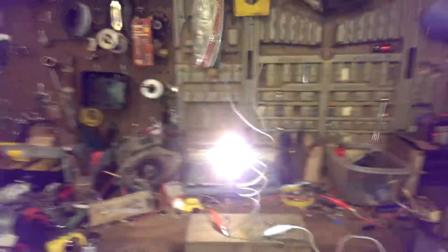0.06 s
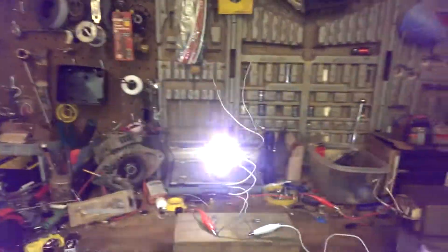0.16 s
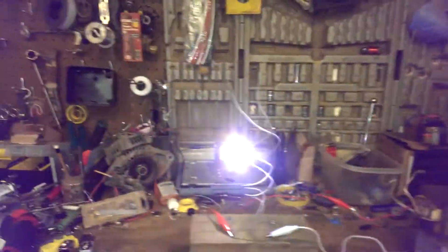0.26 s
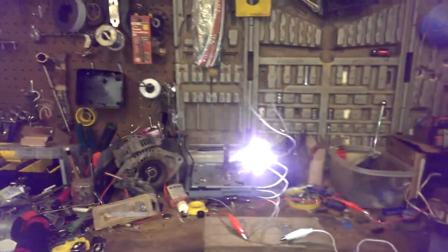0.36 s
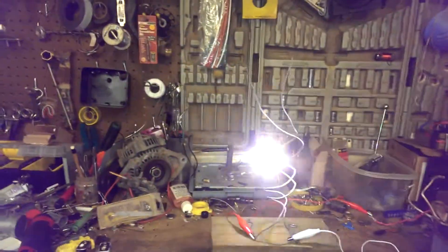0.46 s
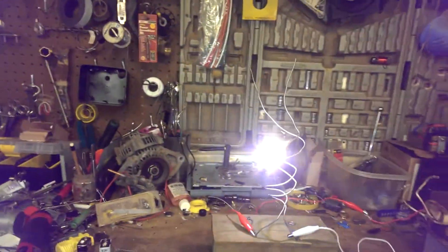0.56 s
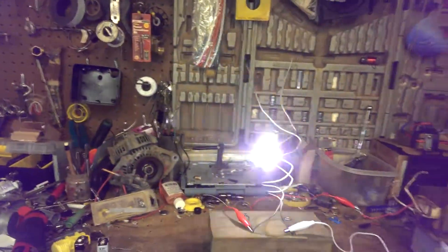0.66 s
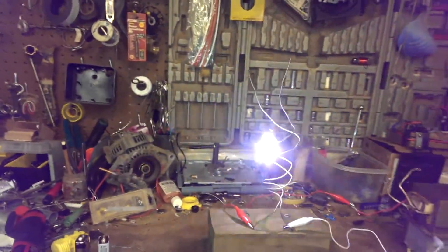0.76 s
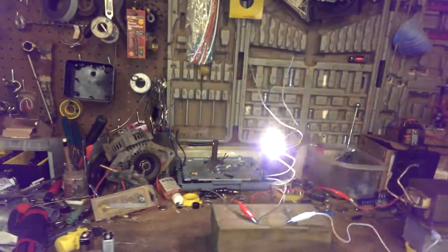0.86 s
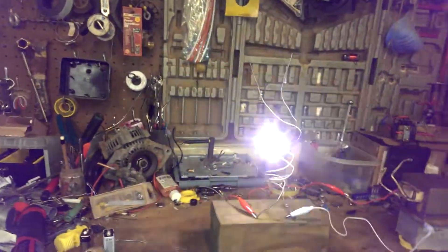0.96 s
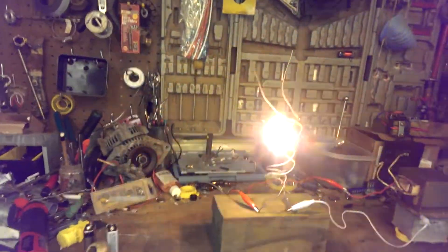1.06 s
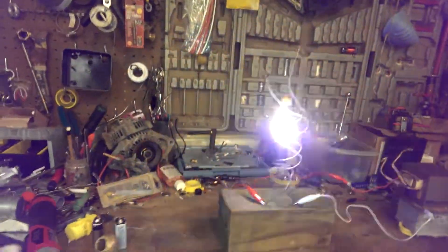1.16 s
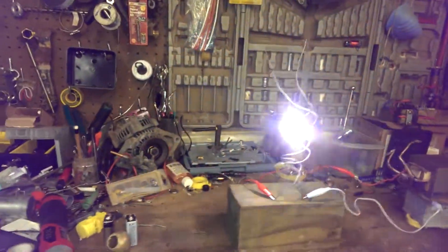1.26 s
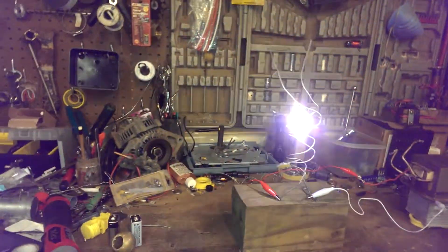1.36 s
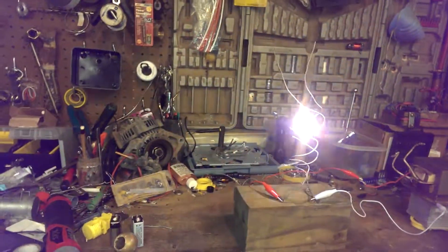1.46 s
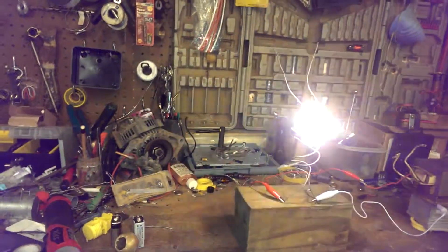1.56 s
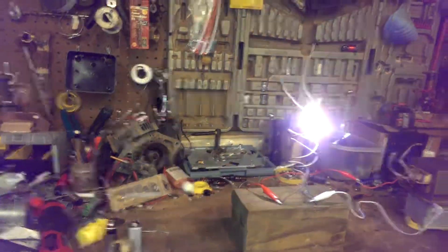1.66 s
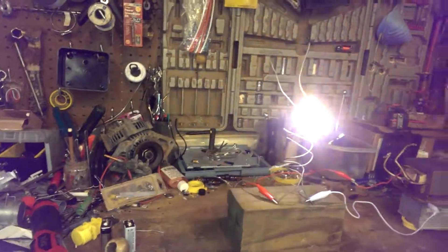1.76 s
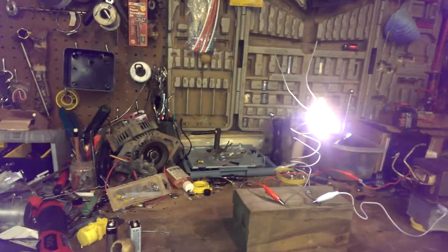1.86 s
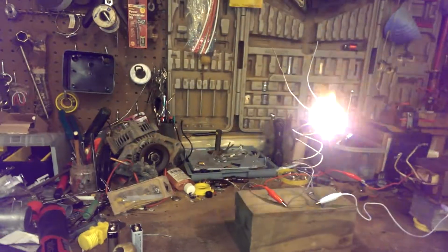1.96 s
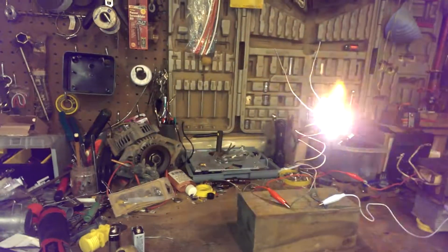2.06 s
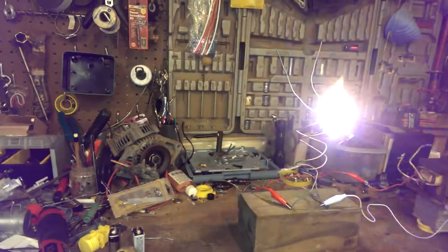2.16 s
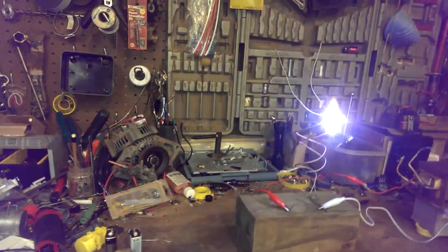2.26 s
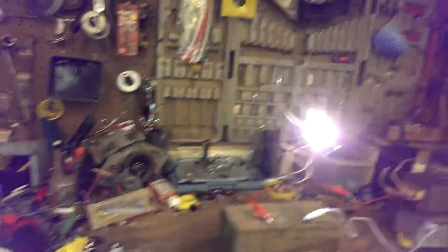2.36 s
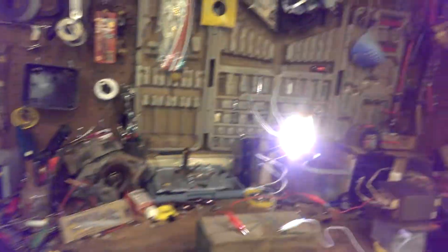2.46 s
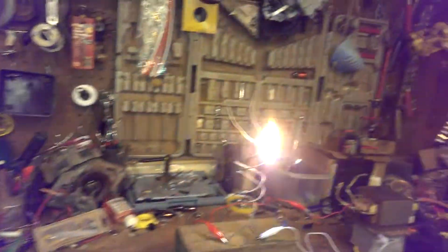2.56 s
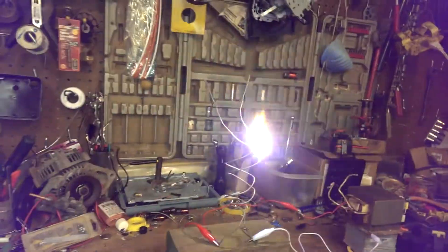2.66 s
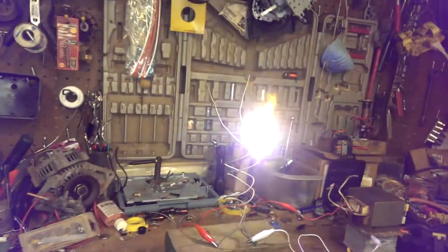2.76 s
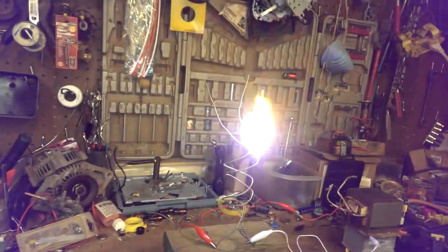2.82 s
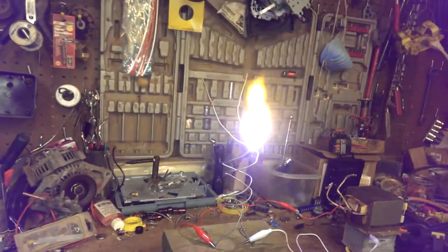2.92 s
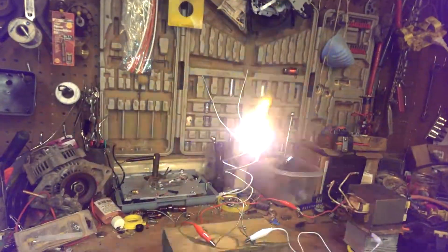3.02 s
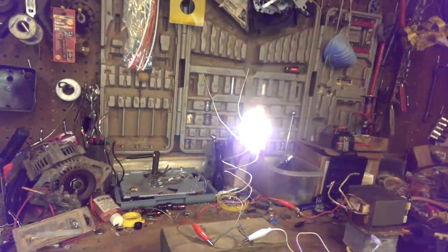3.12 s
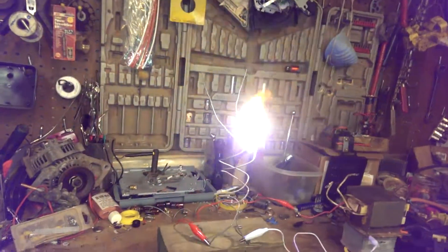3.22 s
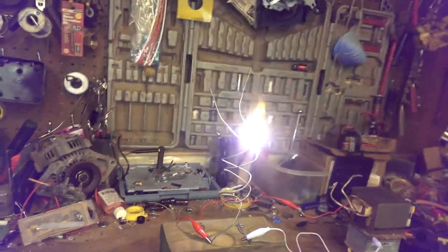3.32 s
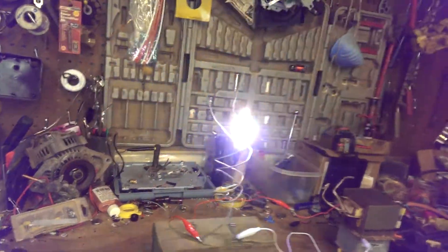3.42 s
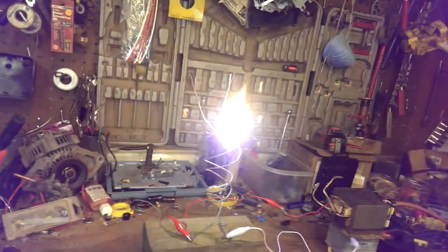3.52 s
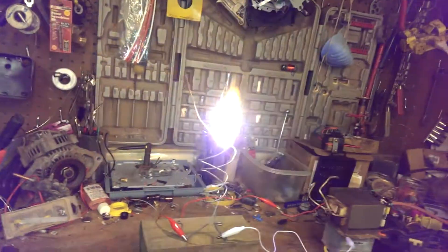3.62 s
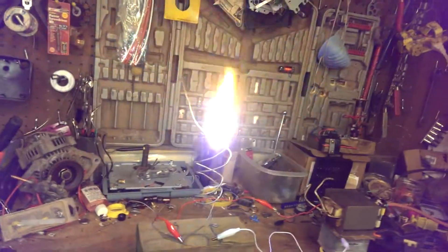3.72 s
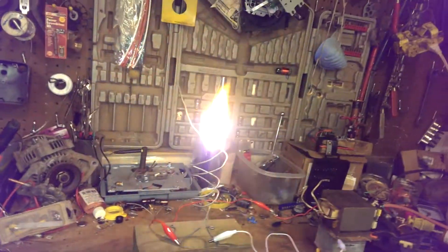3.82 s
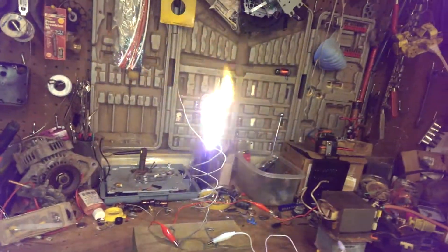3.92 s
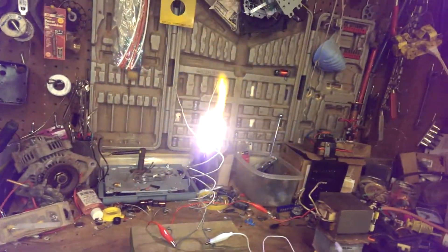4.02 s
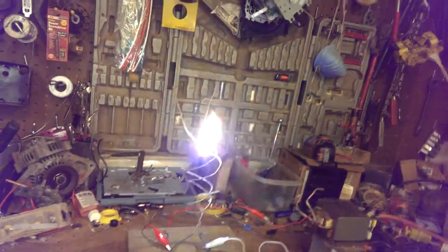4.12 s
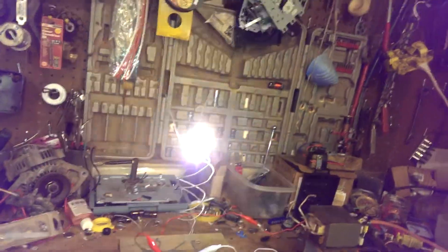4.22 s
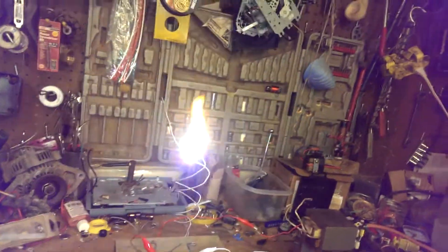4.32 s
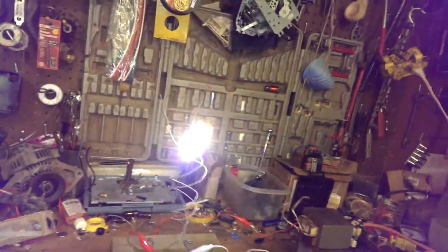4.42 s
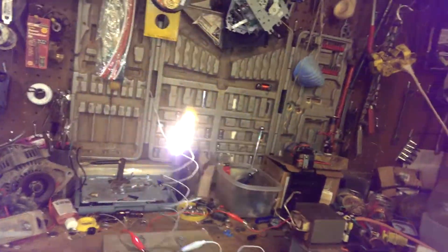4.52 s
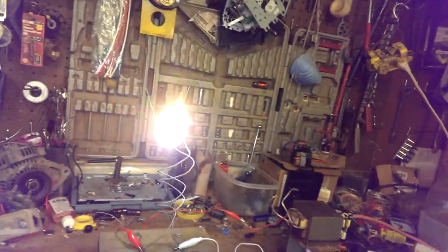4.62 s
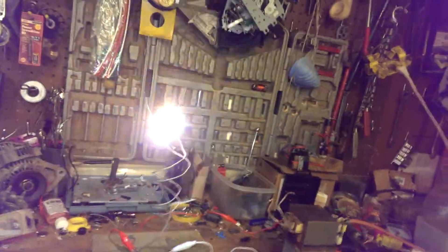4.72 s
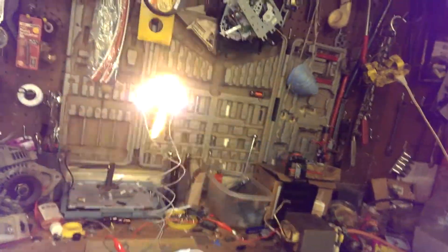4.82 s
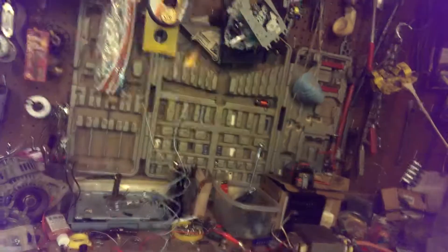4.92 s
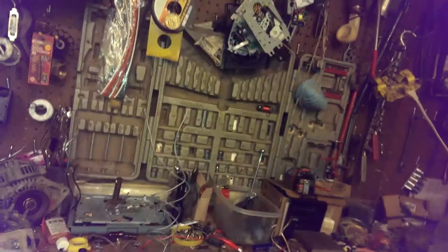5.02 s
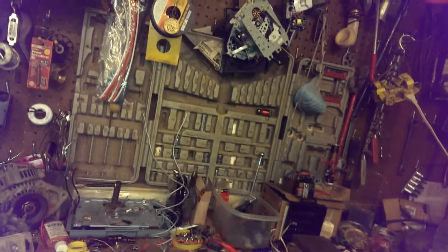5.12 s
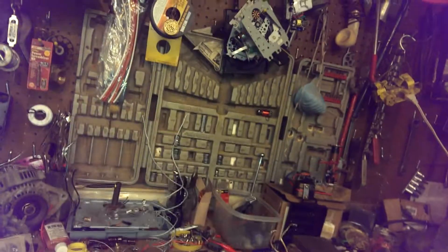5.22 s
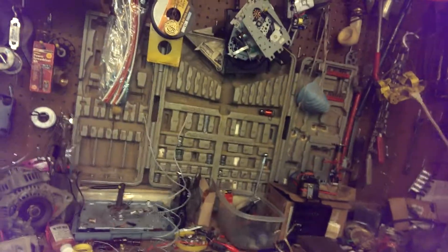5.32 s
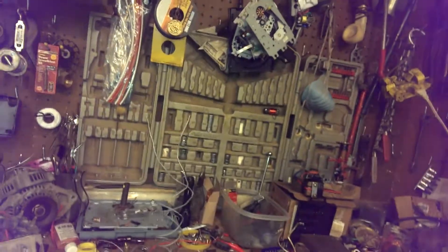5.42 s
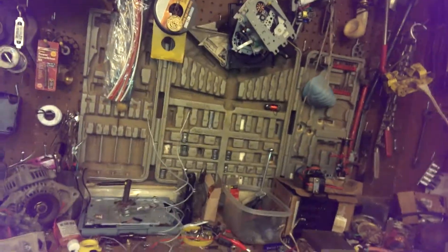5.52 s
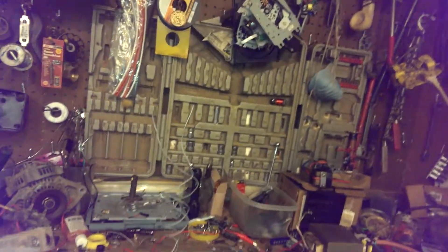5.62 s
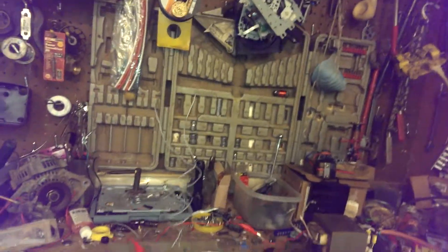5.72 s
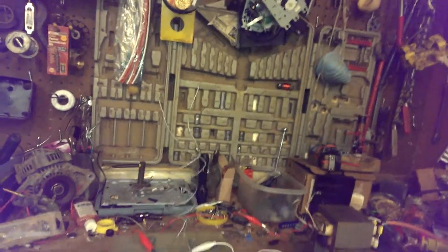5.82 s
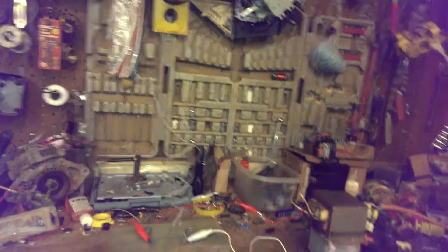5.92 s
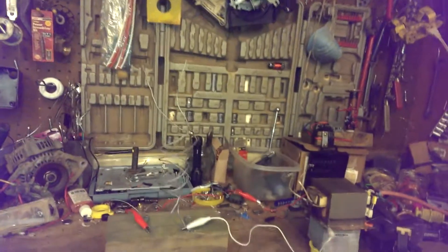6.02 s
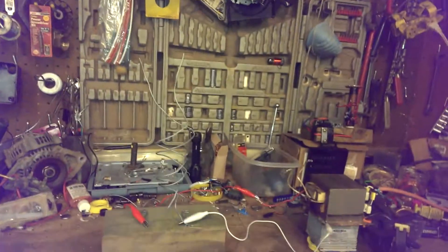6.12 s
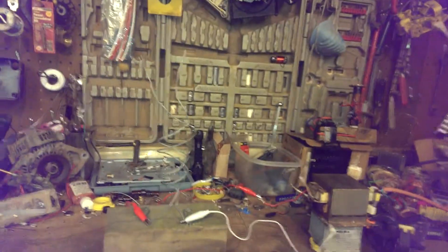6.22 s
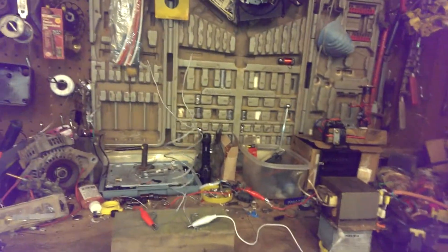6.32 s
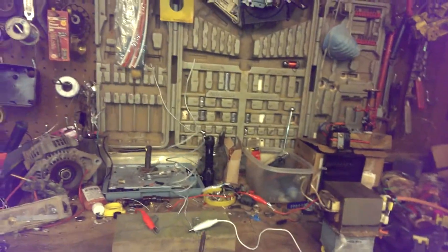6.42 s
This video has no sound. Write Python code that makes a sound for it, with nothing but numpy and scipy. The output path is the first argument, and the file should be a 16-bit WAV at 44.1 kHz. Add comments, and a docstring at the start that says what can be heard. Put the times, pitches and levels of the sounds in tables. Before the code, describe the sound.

In a small cluttered workshop, a handheld microphone near the bench catches a continuous harsh electric buzz, crackling irregularly with hard snaps. The tone starts nasal and shifts with moving short echoes, becoming thicker and more roaring as the arc grows. After almost five seconds it stops suddenly, leaving a very brief room tail, low air noise, faint hum and a few light handling ticks.

```python
"""Over room air and faint mains hum, an arc between two wires snaps unevenly 120 times a second by a workbench camera.
Each strike is a short pressure pulse; hot gas adds hum, whine, roar and hiss, and sparks click from the wire tips.
The arc flares and sags, then grows into a flame from 1.7 to 3.25 s while moving echoes and a nasal resonance colour it.
It stretches and breaks near 4.95 s; a faint spark and four small knocks, ticks with a damped ring, follow."""
import sys
import numpy as np
from scipy import signal
from scipy.fft import rfft, irfft, next_fast_len
from scipy.io import wavfile
from scipy.ndimage import uniform_filter1d

SR = 44100
rng = np.random.default_rng(int(sys.argv[2]) if len(sys.argv) > 2 else 0)


def generate_wav(signal):
    """Clip the signal to [-1, 1] and save it as 16-bit WAV at the path in sys.argv[1]."""
    frames = np.transpose(np.atleast_2d(signal))
    scaled = np.clip(frames, -1, 1) * 32767
    pcm = np.round(scaled).astype(np.int16)
    wavfile.write(sys.argv[1], SR, pcm)


N = 285749
TIME = np.arange(N) / SR  # seconds
STRIKES_PER_S = 120  # one for each mains half cycle
ARC_OUT = 4.946  # the arc breaks (s)
HUM_FADE_S = 0.0072  # time constant of hum and whine once the arc is out
PULSE_MS = np.arange(-128, 128) / SR * 1000  # time around one strike (ms)

# the loudest cracks, levels before trim, room and microphones:
# (time [s], peak level [dB], half width of the pulse [ms])
CRACKS = [(0.1401, -15.5, 0.07), (0.173, -15, 0.05), (0.2394, -17, 0.06), (0.3054, -17, 0.09),
          (0.5902, -15.5, 0.044), (0.6398, -11.5, 0.014), (0.706, -14, 0.035), (0.7398, -15.5, 0.036),
          (0.781, -13, 0.044), (0.814, -11.5, 0.033), (0.8727, -15, 0.033), (0.9396, -14, 0.025),
          (0.9479, -9.5, 0.025), (1.1154, -12, 0.046), (1.1564, -16.5, 0.082), (1.265, -14, 0.044),
          (1.3234, -10, 0.03), (1.3398, -12.5, 0.053), (1.4314, -14, 0.056), (1.6073, -12.5, 0.056),
          (1.6155, -13.5, 0.057), (1.6407, -15.5, 0.059), (1.6734, -14, 0.079), (1.7484, -11, 0.023),
          (1.9314, -12.5, 0.049), (1.9658, -14, 0.072), (1.982, -15, 0.074), (2.032, -14.5, 0.049),
          (2.1407, -11.5, 0.057), (2.1659, -15.5, 0.12), (2.456, -14.5, 0.1), (2.6734, -14, 0.056),
          (2.6908, -12, 0.035), (2.7402, -10, 0.044), (2.7571, -13, 0.049), (2.8069, -12, 0.026),
          (2.8484, -14, 0.03), (2.8653, -14, 0.094), (2.8912, -14.5, 0.061), (2.9069, -12, 0.049),
          (2.974, -14.5, 0.1), (2.991, -14.5, 0.097), (3.0577, -15, 0.05), (3.0901, -14.5, 0.056),
          (3.2237, -13.5, 0.048), (3.257, -13.5, 0.097), (3.274, -14.5, 0.051), (3.3152, -9.0, 0.052),
          (3.349, -14.5, 0.064), (3.3821, -11.5, 0.042), (3.3984, -11, 0.028), (3.4069, -12.5, 0.04),
          (3.4901, -11, 0.038), (3.5573, -17, 0.066), (3.5822, -13.5, 0.062), (3.6157, -12.5, 0.063),
          (3.674, -12, 0.057), (3.7994, -9.5, 0.059), (3.8162, -13, 0.05), (3.8315, -12.5, 0.085),
          (3.8576, -13, 0.063), (3.8671, -17.5, 0.14), (3.875, -14.5, 0.11), (3.9083, -11, 0.07),
          (3.949, -13.5, 0.086), (3.9661, -14.5, 0.18), (4.025, -12.5, 0.035), (4.1083, -13.5, 0.071),
          (4.2073, -13, 0.063), (4.2239, -12, 0.09), (4.2491, -13, 0.038), (4.257, -11, 0.042),
          (4.3498, -12.5, 0.088), (4.391, -12, 0.045), (4.4748, -11.5, 0.037), (4.5159, -9, 0.036),
          (4.5326, -13, 0.1), (4.5828, -11.5, 0.076), (4.6162, -13.0, 0.063), (4.6492, -13, 0.1),
          (4.6668, -13, 0.091), (4.708, -11, 0.091), (4.758, -13, 0.054), (4.7747, -10.5, 0.035),
          (4.799, -10.5, 0.18), (4.8252, -12, 0.08), (4.9, -10, 0.18)]
# a longer, hotter arc strikes later in its half cycle: (time [s], lag [ms])
LAG = [(0, -1.5), (.4, -2.5), (.95, -2), (1.15, -1.5), (1.5, -1.5), (2.1, -1.5), (2.33, -2), (2.65, -1.74),
       (3.5, -1.5), (4.2, -0.88), (4.7, -0.57), (4.9, 0.84)]


def amp(db):
    """Decibels to gain."""
    return 10 ** (np.asarray(db) / 20)


def evened(x):
    """Scales to rms 1."""
    return x / np.sqrt(np.mean(x ** 2) + 1e-20)


def curve(rows, t):
    """Each column of a table at the times t."""
    s, *columns = np.transpose(rows)
    return [np.interp(t, s, c) for c in columns]


def read(points, hz):
    """Each column of a spectrum at the frequencies hz, on a logarithmic frequency axis."""
    f, *columns = np.transpose(points)
    return np.array([np.interp(np.log(hz + 1), np.log(f + 1), c) for c in columns])


def add(mix, s, sound):
    """Mixes a sound in at time s."""
    part = mix[max(round(s * SR), 0):][:len(sound)]
    part += sound[:len(part)]


def coloured(x, points):
    """Filters a sound by the gains of a table."""
    length = x.shape[-1]
    size = next_fast_len(length, True)
    gain = amp(read(points, np.fft.rfftfreq(size, 1 / SR)))
    return irfft(rfft(x, size) * gain, size)[..., :length]


def diffuse(pair):
    """Makes two unrelated signals alike in the bass, as at two close microphones."""
    # diffuse sound at both microphones: (frequency [Hz], left-right correlation [-1 to 1])
    likeness = [(100, 0.89), (400, 0.88), (1000, 0.29), (2000, 0.18), (4000, 0.069)]
    length = pair.shape[1]
    size = next_fast_len(length, True)
    a, b = rfft(pair, size)
    same = np.clip(read(likeness, np.fft.rfftfreq(size, 1 / SR))[0], -1, 1)
    return irfft([a, same * a + np.sqrt(1 - same ** 2) * b], size)[:, :length]


def delayed(x, ms):
    """Delays a sound by a fixed or moving time."""
    return np.interp(TIME - ms / 1000, TIME, x)


def wander(count):
    """A random line through count points."""
    return np.interp(TIME, np.linspace(0, TIME[-1], count), rng.standard_normal(count))


def burning(fade_s):
    """One while the arc burns, then dying away."""
    return np.exp(-np.maximum(TIME - ARC_OUT, 0) / fade_s)


def grown(t):
    """Zero while the arc is short, one once it has grown into a flame."""
    return np.interp(t, [1.7, 3.25], [0, 1])


def flare_db(t, count=2000):
    """Each flare or sag swells or dips and returns in one smooth arch."""
    # (middle time [s], length [s], swell, negative for a sag [dB])
    flares = [(0.141, 0.077, 6), (0.29, 0.13, 4), (0.777, 0.11, 6), (0.99, 0.075, -6), (1.157, 0.34, 6.5),
              (1.363, 0.34, 3), (1.652, 0.14, 9.5), (1.786, 0.13, 5.5), (1.853, 0.068, -10),
              (1.968, 0.3, 4), (2.14, 0.15, 11.5), (2.241, 0.11, 11.5), (2.823, 0.39, 7.5),
              (3.003, 0.28, 6.5), (3.255, 0.3, 7), (3.61, 0.17, 8), (3.74, 0.26, 6.5), (3.99, 0.46, 6),
              (4.36, 0.17, 6), (4.784, 0.2, 3.5)]
    grid = np.linspace(0, TIME[-1], count)
    arches = 0
    for s, length, db in flares:
        arches = arches + db * np.cos(np.pi * np.clip((grid - s) / length, -.5, .5)) ** 2
    return np.interp(t, grid, arches)


def stretched(t, stretch_s=0.15):
    """Rises from zero to one, quickly at first, as the arc is drawn out to its breaking point."""
    return np.sin(np.pi / 2 * np.interp(t, [ARC_OUT - stretch_s, ARC_OUT], [0, 1]))


def restless(t, middle_s=2.33, length_s=0.14, left=0.22):
    """How much strikes differ: one, except for a calm moment that leaves only a share of the scatter."""
    return 1 - (1 - left) * np.exp(-((t - middle_s) / (length_s / 2)) ** 2)


def half_cycles(delay_ms=0.0043):
    """Count of mains half cycles, in step with the strikes."""
    return STRIKES_PER_S * (TIME - (curve(LAG, TIME)[0] + delay_ms) / 1000)


def workshop(air_db=-66):
    """Room air as coloured noise, and steady mains hum as a row of sine tones."""
    # colour of the room air: (frequency [Hz], relative level [dB])
    air_colour = [(25, -22), (65, -1.5), (150, -2.5), (300, -7.5), (1000, -14), (2000, -15), (4000, -19.5),
                  (15000, -27)]
    # steady mains hum: (frequency [Hz], level [dB rms])
    mains = [(240, -73), (360, -88), (480, -72.5), (600, -80.5), (720, -81), (840, -85), (960, -86),
             (1200, -85), (1320, -77.5)]
    air = evened(coloured(diffuse(rng.standard_normal((2, N))), air_colour))
    lines = sum(amp(db) * np.sin(2 * np.pi * (hz * TIME + rng.random())) for hz, db in mains)
    return amp(air_db) * air + np.sqrt(2) * lines


def knocks(rasp=0.17, tick_s=0.0032):
    """Each handling knock is a dry tick and one damped, slightly noisy mode."""
    # levels at the onset, before the decays:
    # (time [s], ring peak level [dB], ring frequency [Hz], ring T60 [s], tick level [dB rms])
    knock_rows = [(5.326, -50, 875, 0.03, -54), (5.425, -57, 190, .07, -62), (5.845, -52, 560, 0.012, -54),
                  (6.397, -54, 964, 0.054, -63)]
    # colour of the tick: (frequency [Hz], relative level [dB])
    tick_colour = [(300, 2), (1100, 1), (1500, -10), (5500, -23.5)]
    out, t = np.zeros(N), np.arange(SR // 5) / SR
    for s, db, hz, t60, tick_db in knock_rows:
        noise = rng.standard_normal(len(t))
        grit = evened(uniform_filter1d(noise, size=14))
        tick = amp(tick_db) * evened(coloured(noise, tick_colour)[0]) * np.exp(-t / tick_s)
        ring = amp(db - 60 * t / t60) * (np.sin(2 * np.pi * hz * t) + rasp * grit)
        add(out, s, tick + ring)
    return out


def hiss(left_db=9.0, right_db=6.5, flicker_db=2.5, flame_share=0.33, throb=0.13, count=380):
    """Thin, flickering hiss of the hot gas that rises when the grown flame flares and stops with the arc."""
    # before channel gains, flares and flicker: (time [s], level [dB])
    hiss_level = [(0, -56.5), (.17, -57.5), (.35, -55), (.47, -57.5), (2.4, -60), (2.75, -59), (4.8, -57),
                  (4.94, -58)]
    # (frequency [Hz], relative level [dB])
    hiss_colour = [(300, 2.5), (4000, 12), (10500, -8.5), (13500, 0.5), (16000, 2)]
    noise = evened(coloured(rng.standard_normal((2, N)), hiss_colour))
    level_db = curve(hiss_level, TIME)[0] + flame_share * grown(TIME) * flare_db(TIME)
    level_db = level_db + flicker_db * wander(count=count)
    throbbing = 1 + throb * np.cos(2 * np.pi * half_cycles())
    return noise * amp(level_db) * amp([[left_db], [right_db]]) * throbbing * burning(0.015)


def roar(short_db=-57, grown_db=-50, flare_share=0.72, throb=0.2):
    """Turbulence in the hot gas: noise that throbs with each half cycle and grows with the flame."""
    # colour of the turbulence: (frequency [Hz], relative level [dB])
    roar_colour = [(25, -34), (70, -10), (160, 5.5), (270, -37), (450, -0.5), (850, 4), (1300, -6),
                   (3000, -33.5)]
    noise = evened(coloured(diffuse(rng.standard_normal((2, N))), roar_colour))
    db = short_db + grown(TIME) * (grown_db - short_db) + flare_share * flare_db(TIME)
    return noise * amp(db) * (1 + throb * np.cos(2 * np.pi * half_cycles())) * burning(0.0087)


def whine(waver=0.3):
    """The hum's clean fifth harmonic, which swells and fades on its own."""
    # before the waver: (time [s], level [dB rms])
    whine_level = [(0, -50), (.9, -52), (1.05, -57), (1.24, -46), (1.42, -56), (1.56, -62), (1.78, -49),
                   (2.08, -67), (2.2, -45), (2.4, -49), (3.55, -59), (3.8, -60), (4.6, -56)]
    tone = (1 + waver * wander(count=60)) * np.cos(2 * np.pi * 5 * half_cycles())
    return -np.sqrt(2) * amp(curve(whine_level, TIME)[0]) * tone * burning(HUM_FADE_S)


def flame(waver=0.21, boom_db=12.5, thins_db=-5.5):
    """Hot gas swells and shrinks with the power, in step with the strikes: a hum of four harmonics."""
    # harmonics 1 to 4, before flares, stretch and waver:
    # (level of a short arc [dB rms], level of a flame [dB rms], share of a flare's swell [ratio])
    harmonics = [(-53, -49.5, 0.43), (-58.5, -57.5, 1.23), (-54.5, -51, 1.1), (-51.5, -44.5, 0.64)]
    turns, size, swell_db, out = half_cycles(), grown(TIME), flare_db(TIME), np.zeros(N)
    for k, (short_db, grown_db, share) in enumerate(harmonics, 1):
        # as the arc stretches, its fundamental booms and its overtones thin
        stretch_db = (boom_db if k == 1 else thins_db) * stretched(TIME)
        db = short_db + size * (grown_db - short_db) + share * swell_db + stretch_db
        out -= amp(db) * (1 + waver * wander(count=130)) * np.cos(2 * np.pi * k * turns)
    return np.sqrt(2) * out * burning(HUM_FADE_S)


def sparks(width_ms=0.086, scatter_db=-26.0, scatter_ms=2.4):
    """Tiny shock waves off the wire tips: a sudden push, a short pull and a brief scatter off the bench."""
    # at the source: (time [s], peak level of the push [dB])
    spark_rows = [(1.596, -12.5), (3.1334, -19.5), (3.9662, -21), (4.7992, -18), (5.0584, -43)]
    out, ms = np.zeros(N), np.arange(SR // 25) / SR * 1000
    u = ms / width_ms
    for s, db in spark_rows:
        scatter = amp(scatter_db) * rng.standard_normal(len(ms)) * np.exp(-ms / scatter_ms)
        add(out, s, amp(db) * ((1 - u) * np.exp(-u) + scatter))
    return out


def pulse_ms(t, flare_widens=0.51, stretch_widens_db=5):
    """The bigger the arc, the wider and duller its pressure pulse."""
    # ordinary strike before flares, stretch and scatter: (time [s], half width [ms])
    half_width = [(.35, 0.056), (.55, 0.037), (1.64, .05), (3.3, 0.082)]
    # flare_widens is dB of width per dB of swell
    return curve(half_width, t)[0] * amp(flare_widens * flare_db(t) + stretch_widens_db * stretched(t))


def falter_db(t, depth_db=-2, falter_s=0.026):
    """Strikes weaken just before a crack, while the voltage builds."""
    age = t[:, None] - np.array(CRACKS)[:, 0]
    before = (age < 0) * np.exp(-(age / falter_s) ** 2)
    return depth_db * before.max(1)


def pulse(half_ms, swell, sizzle, swell_ms=0.57, sizzle_ms=1.03):
    """The gas swells and fizzes as the voltage builds, then the strike snaps."""
    half_ms = max(half_ms, .02)
    snap = np.hanning(len(PULSE_MS)) / (1 + (PULSE_MS / half_ms) ** 2)
    hump = np.exp(-(PULSE_MS / swell_ms + 1) ** 2)
    soft_noise = uniform_filter1d(uniform_filter1d(rng.standard_normal(len(snap)), size=12), size=7)
    fizz = evened(soft_noise) * np.exp(-(PULSE_MS / sizzle_ms + 1) ** 2)
    return swell * hump * snap.sum() / hump.sum() + sizzle * fizz - snap


def strikes(scatter_db=3.0, lopsided=1.1, width_scatter=0.74, sharpening=0.39, jitter_ms=.17,
            hard_late_ms=.25, flare_hardens=0.24, sizzle_db=-1.0, ceiling_db=-13.0, swell=0.44,
            fizz=0.076, split_share=.22, split_ms=.55, crack_db=0.28):
    """One pulse each half cycle; a harder strike waits for a higher voltage, so it is later and brighter."""
    # ordinary strikes before flares, scatter and trim: (time [s], peak level [dB])
    snap_level = [(0, -24), (.15, -21), (.45, -21), (.72, -19), (.9, -19), (1.35, -20.5), (1.56, -21.5),
                  (1.61, -19), (2.02, -19), (2.08, -21.5), (2.36, -24), (2.47, -18), (2.72, -18.5),
                  (3.05, -20), (3.38, -19), (4.16, -21), (4.7, -16.5), (4.94, -17)]
    s = np.arange(1, int(ARC_OUT * STRIKES_PER_S) + 1) / STRIKES_PER_S
    size, spread, late = rng.standard_normal((len(s), 3)).T
    # for a while one polarity strikes harder than the other, which gives the buzz its rasp
    favoured = np.interp(s, TIME, wander(count=45)) * np.cos(np.pi * STRIKES_PER_S * s)
    size = evened(size + lopsided * favoured)
    size, spread, late = np.array([size, spread, late]) * restless(s)
    s = s + (curve(LAG, s)[0] + hard_late_ms * size + jitter_ms * late) / 1000
    # flare_hardens is dB of peak per dB of swell; the ceiling comes before the sizzle_db trim
    db = curve(snap_level, s)[0] + flare_hardens * flare_db(s) + falter_db(s)
    db = np.minimum(db + scatter_db * size, ceiling_db) + sizzle_db
    width = pulse_ms(s) * np.exp(width_scatter * np.clip(spread, -1, 1) - sharpening * np.minimum(size, 1))
    # a loud crack takes the place of its half cycle's ordinary strike
    free = abs(s[:, None] - np.array(CRACKS)[:, 0]).min(1) > .5 / STRIKES_PER_S
    out, lead_s = np.zeros(N), PULSE_MS[0] / 1000
    for at, peak_db, half_ms in np.transpose([s, db, width])[free]:
        chance, gap, puff = rng.random(3)
        offsets_ms = [0]
        # some strikes stutter: two weaker snaps in quick succession
        if chance < split_share * restless(at):
            offsets_ms = np.array([-.5, .5]) * split_ms * (.5 + gap)
        gain = amp(peak_db) / np.sqrt(len(offsets_ms))
        for ms in offsets_ms:
            add(out, at + lead_s + ms / 1000, gain * pulse(half_ms, swell * (.5 + puff), fizz))
    for at, peak_db, half_ms in CRACKS:
        add(out, at + lead_s, amp(peak_db + crack_db) * pulse(half_ms, swell, fizz / 2))
    # the length of the channel smears every pulse a little
    return uniform_filter1d(out, size=3)


def hollow(x, width_hz=420):
    """A nasal resonance in the crackle that slides and fades as the camera turns."""
    # (time [s], centre frequency [Hz], share added [ratio])
    resonance = [(.4, 2010, .8), (.8, 2300, .55), (1.7, 2190, 0.29), (3, 1990, 0.22)]
    hz, share = curve(resonance, TIME)
    # shift the resonance down to zero frequency, smooth there, and shift it back
    turn, r = np.exp(2j * np.pi * np.cumsum(hz) / SR), np.exp(-np.pi * width_hz / SR)
    smooth = signal.lfilter([1 - r], [1, -r], x / turn + 1e-18)
    return x + share * 2 * (turn * smooth).real


def room(x, wet_db=-1.5, onset_ms=1.32, clutter=1.3, clutter_ms=1.24, count=20):
    """Direct sound, near and far echoes and a short tail; the far echoes stay, the rest shifts with the camera."""
    # as the camera swings past, one microphone hears the arc sooner: (time [s], left lag behind right [ms])
    bearing = [(0, -0.073), (1.2, -0.0005), (2.2, 0.069), (2.7, -0.0059), (3.7, -0.06), (4.8, -0.14)]
    # gliding echoes that ring in the buzz: (time [s], bench left [ms], bench right [ms], bench share [ratio],
    # tool wall left [ms], tool wall right [ms], tool wall share [ratio])
    near_echoes = [(.2, 2.25, 2.9, 0.13, 2.9, 4.1, 0.17), (.75, 2.5, 2.4, 0.15, 2.9, 2.7, 0.079),
                   (1.4, 2.78, 2.63, 0.28, 2.2, 3.1, 0.068), (2.25, 2.82, 2.5, 0.25, 2.3, 3.18, 0.094),
                   (2.9, 2.55, 2.47, 0.37, 2.98, 3.03, 0.11), (4, 2.36, 2.35, .36, 2.7, 3.2, 0.15),
                   (4.9, 2.3, 2.12, 0.37, 2.93, 3.2, 0.14)]
    # off the shelves: (left delay [ms], right delay [ms], share [ratio])
    far_echoes = [(7.7, 6.8, 0.1), (3, 13, 0.11)]
    # decay of the tail: (frequency [Hz], T60 [s])
    tail_t60 = [(120, 0.32), (430, 0.2), (1400, 0.12), (9000, 0.23)]
    # colour of the tail: (frequency [Hz], relative level [dB])
    tail_colour = [(70, -29), (150, 7), (290, -4.5), (410, 6), (545, -2.5), (700, 1), (900, 2.5), (3000, 1),
                   (8000, 2.5)]
    t = np.arange(SR // 3) / SR
    lag_ms = curve(bearing, TIME)[0]
    out = np.array([delayed(x, lag_ms / 2), delayed(x, -lag_ms / 2)])
    bench_left, bench_right, bench, wall_left, wall_right, wall = curve(near_echoes, TIME)
    moving = [(bench_left, bench_right, bench), (wall_left, wall_right, wall)]
    for *delays, share in moving + far_echoes:
        out += share * np.array([delayed(x, ms) for ms in delays])
    place = np.minimum(TIME / ARC_OUT, 1) * (count - 1)
    for k in range(count):  # one tail for each place along the camera's path
        taps = rng.standard_normal((2, len(t))) * (rng.random((2, len(t))) < .1)
        hz, age, z = signal.stft(diffuse(taps), SR, nperseg=256)
        decay = amp(-60 * age / read(tail_t60, hz).T)
        tail = signal.istft(z * decay, SR, nperseg=256)[1][:, :len(t)]
        # tools and parts close to the arc scatter a dense burst ahead of the tail
        onset = 1 - np.exp(-(t * 1000 / onset_ms) ** 2)
        tail = tail * onset * (1 + clutter * np.exp(-t * 1000 / clutter_ms))
        tail = coloured(tail / np.linalg.norm(tail[0]), tail_colour)[:, :SR // 4]
        # crossfade between neighbouring places
        nearness = np.cos(np.pi / 2 * np.clip(place - k, -1, 1))
        first, last = np.flatnonzero(nearness > 1e-6)[[0, -1]]
        for channel, response in zip(out, tail):
            wet = signal.fftconvolve((x * nearness)[first:last], response)
            add(channel, first / SR, amp(wet_db) * wet)
    return out


def microphones(pair, size=4096):
    """Causal, minimum-phase colour of each microphone port."""
    # response of the two microphones: (frequency [Hz], left gain [dB], right gain [dB])
    mic_gains = [(41, -34.5, -35.5), (140, -8, -8), (205, -9, -13.5), (443, -3.5, -5), (796, 0, -1),
                 (1490, 3, 0.5), (2070, 5, 3.5), (3600, -1, 8), (4460, -5, 8), (6220, -2, -2.5),
                 (8200, -11, -7), (12500, -25, -24)]
    log_gain = np.log(amp(read(mic_gains, abs(np.fft.fftfreq(size, 1 / SR)))))
    response = np.fft.ifft(np.exp(np.conj(signal.hilbert(log_gain)))).real[:, :size // 2]
    return signal.oaconvolve(pair, response, axes=1)[:, :N]


def scene(spark_right_db=-29.0):
    """The arc in its room over the quiet workshop; sparks are also heard dry, mostly on the left."""
    snaps = sparks()
    arc = microphones(room(hollow(strikes()) + snaps))
    dry_sparks = snaps * amp([[0], [spark_right_db]])
    return arc + flame() + whine() + roar() + hiss() + dry_sparks + knocks() + workshop()


def record(dry, edge_hz=16100):
    """Band limit: a steep low-pass takes away the top of the treble."""
    low_pass = signal.firwin(511, edge_hz, window=("kaiser", 9), fs=SR)
    return signal.oaconvolve(dry, low_pass[None], "same")


dry = scene()
out = record(dry)
generate_wav(out)
```